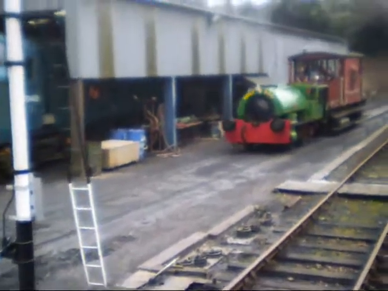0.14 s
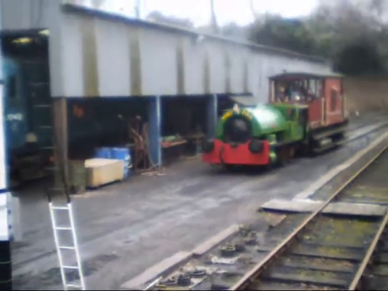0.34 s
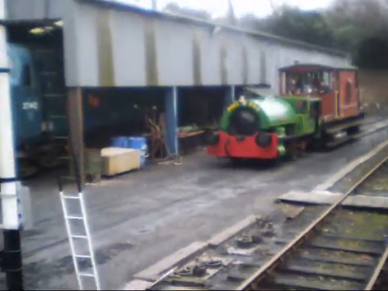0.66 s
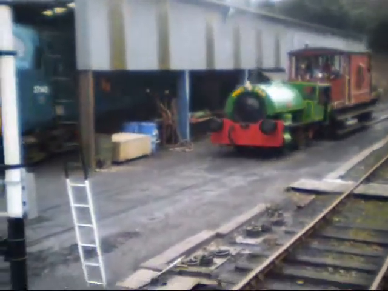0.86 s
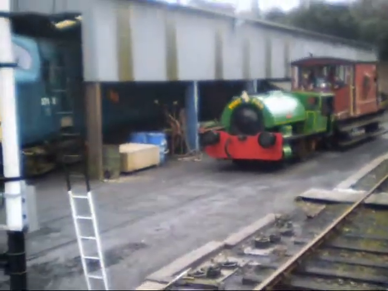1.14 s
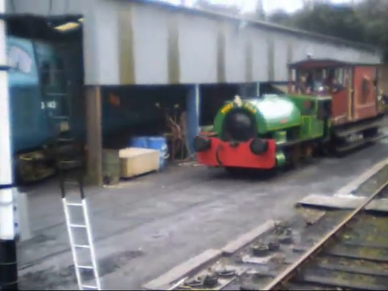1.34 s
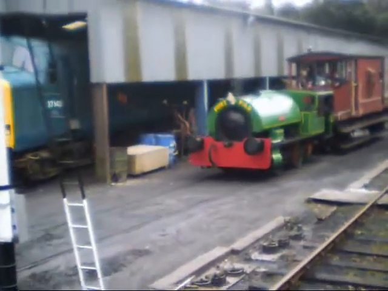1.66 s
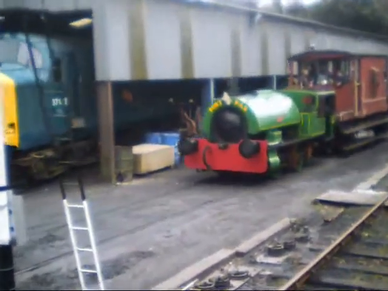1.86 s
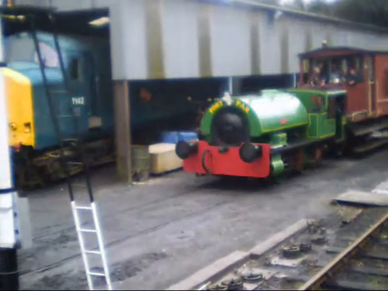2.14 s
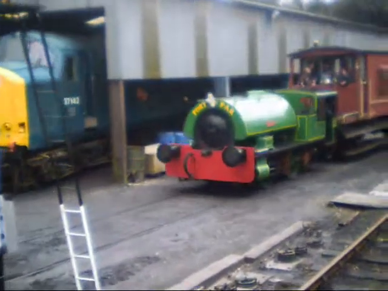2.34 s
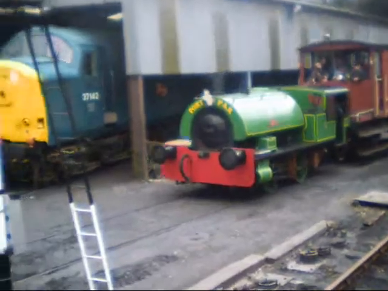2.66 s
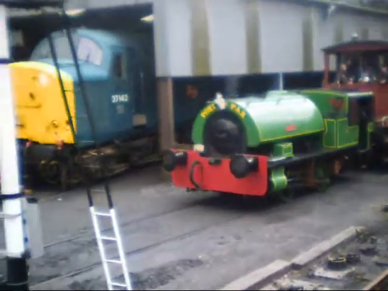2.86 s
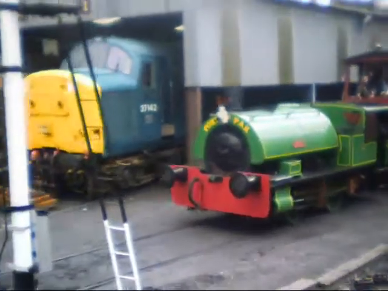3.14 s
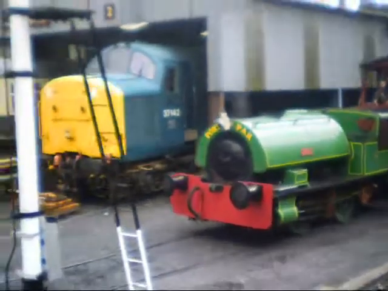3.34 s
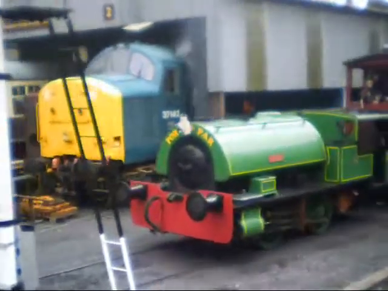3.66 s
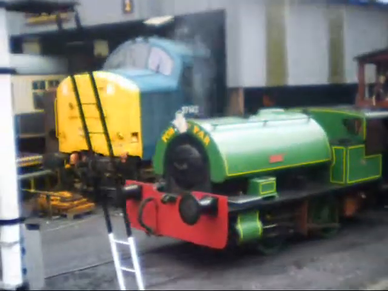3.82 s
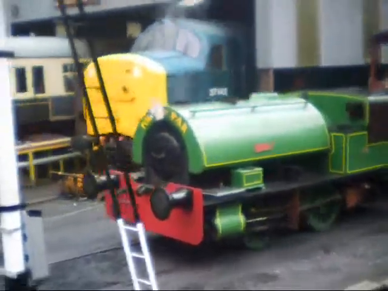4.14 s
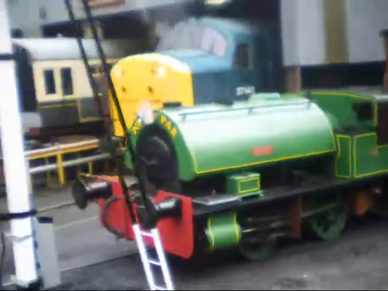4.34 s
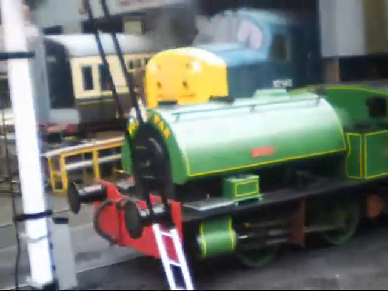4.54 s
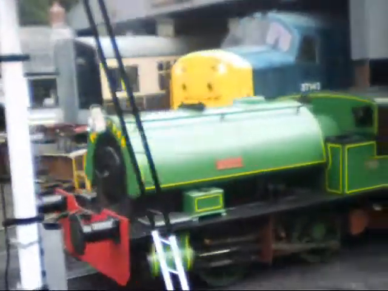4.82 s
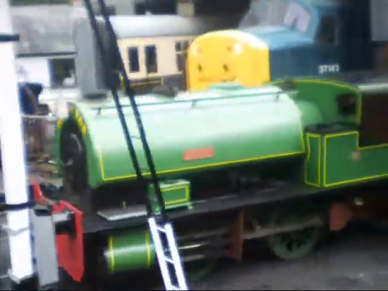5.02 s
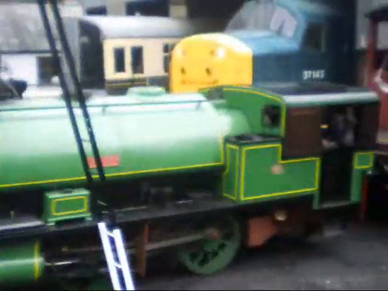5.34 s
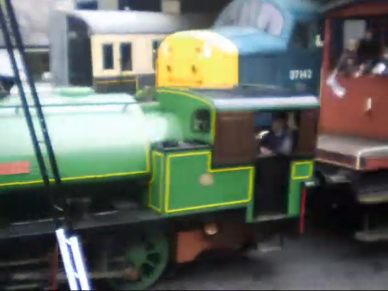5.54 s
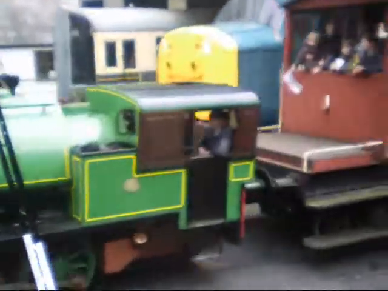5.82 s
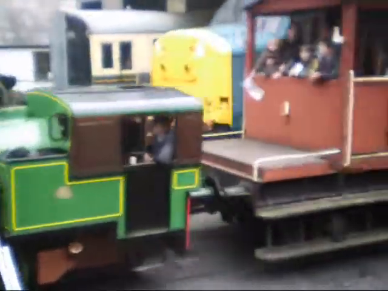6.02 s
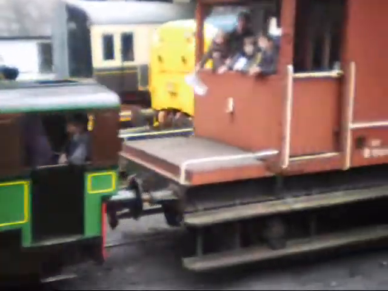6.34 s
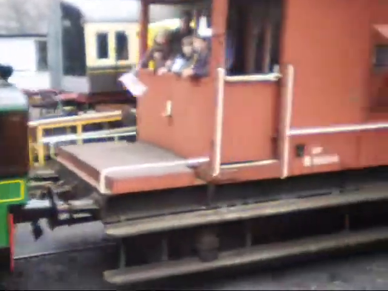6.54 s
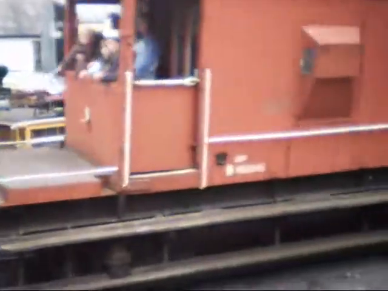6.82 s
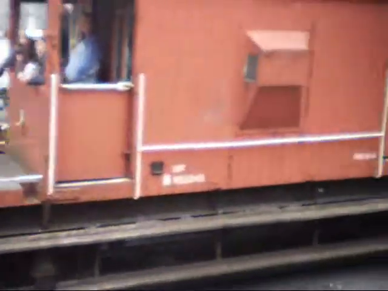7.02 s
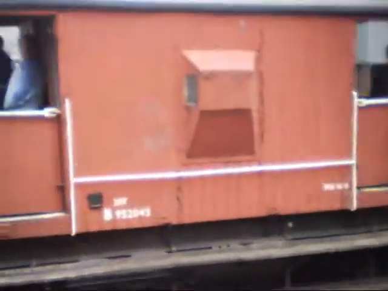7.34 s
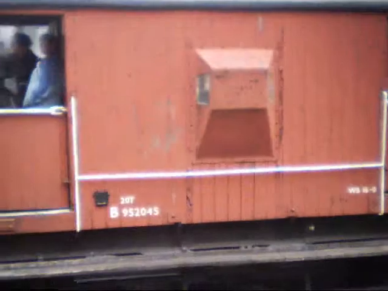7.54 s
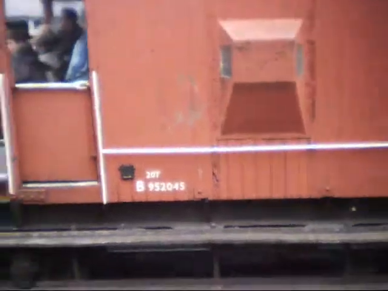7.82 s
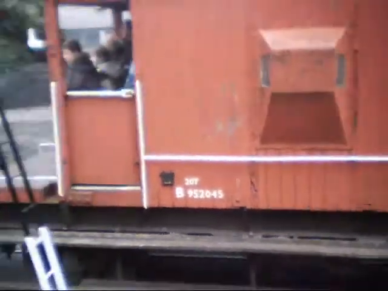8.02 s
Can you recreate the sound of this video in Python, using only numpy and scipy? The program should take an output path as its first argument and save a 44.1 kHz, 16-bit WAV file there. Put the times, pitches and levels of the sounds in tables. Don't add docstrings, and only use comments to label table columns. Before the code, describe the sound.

Outdoors beside a shed, a small steam engine and wagon roll slowly past a cheap handheld microphone. Continuous breathy steam hiss lies over a soft wheel roar, its colour shifting as the engine turns past. Light knocks come midway, then a hard metallic clank with a short squeak, and later a tiny higher squeak. Wind thumps and flutters on the microphone throughout, busiest in the second half.

```python
import sys
import numpy as np
from scipy import signal
from scipy.fft import rfft, irfft, next_fast_len
from scipy.io import wavfile
from scipy.ndimage import uniform_filter1d, map_coordinates

SR = 44100
rng = np.random.default_rng(int(sys.argv[2]) if len(sys.argv) > 2 else 0)


def volts(x):
    e = np.asarray(x, float) / 20
    return 10 ** e


def dump_mix(stems):
    frames = np.atleast_2d(stems).T
    limited = np.clip(frames, -1, 1)
    pcm = np.round(limited * 32767).astype(np.int16)
    wavfile.write(sys.argv[1], SR, pcm)


N = 360583

# frequency in Hz, level in dB per Hz.
ROAR_SPECTRUM = [(190, -36), (330, -13), (550, -8.5), (750, -2.5), (1170, -3), (1260, 4.5), (1690, -5),
                 (1830, 1), (2100, -7), (2730, -37), (4620, -120)]
# frequency in Hz, level in dB per Hz.
JET_SPECTRUM = [(1120, -37), (1900, -6), (2760, -1.5), (3000, -2.5), (3620, -0.5), (4500, -5.5),
                (5850, -52), (9900, -120)]
# frequency in Hz, level in dB per Hz.
LEAK_SPECTRUM = [(2530, -39), (4300, -1), (4500, 0), (4560, 12), (5280, 13), (6700, 3.5), (8710, -48),
                 (14700, -120)]
# frequency in Hz, level in dB per Hz.
SPRAY_SPECTRUM = [(3820, -8), (6500, -1.5), (6790, -3), (8430, 2.5), (11000, 2), (14300, -32),
                  (22000, -120)]
# time in seconds, jet level in dB, wetness as spray over jet in dB.
STEAM = [(0, -39.5, -10), (.55, -42, -10.5), (.9, -44.5, -9), (1.4, -43, -9), (1.8, -40.5, -11),
         (2.45, -39.5, -9.5), (2.65, -36, -10), (3.15, -36.5, -11), (3.8, -36, -6.5), (4.22, -36.5, -11),
         (4.4, -39, -5.5), (4.75, -43, -7), (5.6, -44.5, -4), (6.3, -42.5, -4), (6.7, -40.5, -3),
         (7.3, -45, 2.5), (7.8, -42.5, -2), (8.18, -40, -4.5)]
# time in seconds, level in dB.
ROLLING = [(0, -42.5), (.6, -42), (1.35, -45.5), (1.8, -42.5), (3.2, -42.5), (4.05, -41), (5.2, -46.5),
           (6.4, -42), (8.18, -46.5)]
# time in seconds, half length in seconds,
# gain in dB, most affected layer from 0 (roar) to 3 (spray).
PUFFS = [(.3, .15, 1, 2.5), (1.358, 0.05, 0.5, -2.5), (2.61, 0.049, 1.5, 3.5), (2.91, 0.12, -3, 0.5),
         (3.145, 0.035, -4, 1.5), (3.92, 0.12, 2.5, 1.7), (4.153, 0.066, 4.5, 3.5), (4.286, 0.029, -3, 1.7),
         (4.474, 0.043, 5, 1.7), (4.693, 0.17, 3.5, 2), (4.77, 0.048, -5.5, 1.9), (4.908, .05, 2, 1.5),
         (5.015, 0.056, -3, 2), (5.173, 0.11, 2, 1.5), (5.333, 0.073, 4, 3), (5.54, 0.052, -2.5, 3),
         (6.197, .06, 3, 3.5), (6.467, 0.026, 12.5, -0.5), (6.518, 0.048, 6, 2.5), (6.793, 0.034, 2.5, 2.5),
         (7.144, .07, 2.5, 1.6), (7.25, 0.05, -3.5, 3.5), (7.462, 0.063, 4, 1.3), (7.663, 0.07, -1.5, 3),
         (7.89, 0.021, 3.5, 2), (8.144, 0.098, 3.5, -0.7)]
# start in seconds, strongest moment in seconds, end in seconds, frequency in Hz, gain in dB.
SINGING = [(-2, .4, 14, 1002, 4.5), (0, 5, 5.05, 1403, 7.5), (-1.5, 3.5, 12.4, 1135, 7),
           (2, 2.4, 3.3, 990, 2.5), (1.5, 2.7, 4.7, 2315, 5), (-1.5, 4.4, 5, 1650, 8),
           (.5, 3.7, 7.5, 745, 4.5), (-.5, 1.8, 6.4, 868, -3.5), (2.5, 3.9, 5, 2790, 3.5),
           (4, 3.1, 5.8, 3640, 4)]
# start in seconds, strongest moment in seconds, end in seconds, frequency in Hz, gain in dB.
HOLLOWS = [(1.1, 1.7, 3.9, 3570, 3.5), (3.2, 4.2, 4.7, 2740, 3), (4, 5.2, 5.7, 7200, 9),
           (4.9, 6.3, 7.8, 4400, -1), (6.1, 6, 6.8, 11000, 9), (6.6, 8, 8.6, 1425, -19),
           (7.42, 7.46, 8.1, 3630, 7), (7.1, 8.1, 8.6, 5000, -1), (5.0, 5.37, 5.9, 5800, -6),
           (1.9, 3.3, 4.4, 1950, -5), (4.16, 4, 4.56, 575, 10.5), (0.37, 0.42, .62, 520, 6),
           (7.3, 8.4, 8.6, 710, 3.5), (4.55, 5.1, 5.6, 550, -3.5)]
# start in seconds, strongest moment in seconds, end in seconds, frequency in Hz, gain in dB.
PANELS = [(-.5, .2, 2.2, 6000, 4.5), (1.6, 2.7, 3.2, 4750, 6), (3.3, 3.55, 3.85, 4080, 7),
          (4.5, 5.8, 7.0, 3380, -4), (5.12, 5.28, 5.52, 5300, 6), (5.3, 5.34, 5.43, 5250, 12),
          (5.2, 5.35, 5.48, 6400, 5), (6.8, 7.7, 8.6, 6200, -4), (5.57, 5.62, 5.85, 1150, 3),
          (5.55, 6.05, 6.5, 5020, 7), (6.42, 6.55, 7.6, 8100, 5), (6.45, 6.8, 7.3, 5450, 4),
          (6.3, 7.6, 8.6, 7050, -6), (6.8, 7.8, 9.0, 1640, 8.5), (2.5, 2.68, 2.9, 3500, 3)]
# start in seconds, strongest moment in seconds, end in seconds, frequency in Hz, gain in dB.
RIDGES = [(2.2, 2.9, 3.6, 2780, 2.5), (3.9, 4.2, 4.8, 2740, 4.5), (5, 3.7, 4.3, 2800, -4),
          (1, 2.6, 2.9, 3760, 3.5), (2.9, 3.1, 3.4, 3690, 6), (3.5, 4.1, 4.3, 3560, 4.5),
          (4.5, 3.8, 3.8, 4130, 5), (5, 3.6, 3.9, 3900, 1), (2.3, 2.65, 3.2, 3250, 5),
          (2.5, 2.7, 2.95, 2310, 3), (4.35, 4.5, 4.6, 4050, 5), (1.9, 2.7, 3.3, 4430, -6),
          (2, 2.7, 3.2, 2300, -6), (3, 4.5, 4.7, 5150, -7), (3.6, 4.2, 4.6, 5460, 4.5),
          (4.2, 4.95, 5.3, 2400, -8), (4.5, 6.2, 7.5, 2606, 7.5), (6.6, 7.3, 8.1, 4900, -4),
          (1.1, 1.4, 2.5, 4200, 10.5), (-2, 1.0, 2.1, 2440, 1), (0, 2.2, 2.9, 4450, -1),
          (-1, .5, 1.2, 4000, -4), (3.5, 5.45, 6.1, 5620, -8), (7.5, 8.15, 8.5, 2830, 7),
          (7.25, 7.55, 7.95, 2780, -4), (6.9, 7.7, 8.4, 1600, 4), (6.9, 7.3, 8.4, 1720, 2.5),
          (5.8, 6.15, 7.1, 1330, -5), (0, 1.45, 1.8, 4300, 4), (4.2, 4.45, 4.6, 5200, -4),
          (4.0, 4.1, 4.2, 1650, -3), (1.8, 1.93, 2.1, 4250, 3), (2, 1.85, 2.1, 4600, 6.5),
          (7.5, 6.8, 7.64, 2000, 9), (0, 2.4, 3.0, 2500, -3), (6, 5.15, 5.7, 2800, 6),
          (4.5, 4.8, 5.8, 7850, -6), (3, 5.6, 6.1, 6100, -10)]
# start in seconds, strongest moment in seconds, end in seconds, frequency in Hz, gain in dB.
WHISTLES = [(-.4, .08, .5, 2860, 7.4), (-.4, .1, .7, 3600, 6.3), (0, .2, .7, 3330, 5),
            (-.2, .15, .4, 4140, 5), (.3, .5, 0.87, 2400, 7.1), (1.9, 2.25, 2.55, 3720, 8),
            (1.95, 2.2, 2.6, 2760, 7), (2.0, 2.25, 2.5, 2100, 4.7), (2.3, 2.65, 2.9, 4850, 5.4),
            (2.75, 2.92, 3.2, 2860, 7), (2.85, 3.05, 3.6, 4150, 4.9), (3.15, 3.25, 3.5, 2850, 6),
            (3.55, 3.8, 4.3, 2706, 7.8), (4.0, 4.12, 4.6, 3150, 6), (4.0, 4.2, 4.4, 2080, 4),
            (5.0, 5.12, 5.7, 1700, 8.8), (5.0, 5.12, 5.3, 1403, 4.3), (4.5, 4.8, 5.7, 2070, 5.9),
            (5.2, 5.4, 6.4, 1000, 4), (4.55, 4.62, 5.7, 7300, 6), (4.85, 4.95, 5.9, 7300, 4),
            (5.2, 5.28, 5.9, 7380, 7.6), (5.28, 5.36, 5.5, 7180, 7), (5.68, 5.74, 5.8, 7300, 6),
            (5.9, 5.97, 6.03, 7350, 5.2), (7.6, 8.0, 9.9, 3060, 9.2), (7.95, 8.15, 8.4, 3500, 4),
            (7.4, 7.7, 8.0, 1850, 3)]
# delay in seconds, level in dB, phase turn in cycles,
# frequency in Hz above which it is dull, time in seconds by which it sinks to a quarter.
ECHOES = [(.0076, -8.5, .63, 1900, 6.6), (.0075, -14, .0, 6000, 6.6), (.00219, -14, .0, 12000, 8.5),
          (.001096, -15, .0, 12000, 8.5)]
# time in seconds, peak in dB,
# loudest ring in Hz, ring's 60 dB decay in seconds, clatter in dB.
KNOCKS = [(2.945, -34, 2300, .05, -57), (5.0175, -34, 1760, 0.035, -43), (5.021, -35, 2400, .03, -43),
          (5.5705, -33, 2050, 0.04, -37), (5.574, -35, 1136, 0.2, -39), (7.198, -37, 950, 0.25, -38),
          (7.2055, -34, 1400, 0.05, -38), (6.429, -32, 2690, 0.09, -58), (6.4495, -21, 1224, 0.12, -36),
          (6.4655, -20, 1205, 0.05, -37), (6.474, -28, 1810, 0.08, -34), (6.488, -30, 833, 0.13, -46),
          (7.89, -33, 3130, 0.061, -56)]
# start in seconds, loudest moment in seconds, end in seconds,
# frequency in Hz, peak in dB.
SQUEAKS = [
    (6.486, 6.511, 6.552, 4340, -23),
    (6.535, 6.55, 6.58, 4355, -38),
    (7.295, 7.349, 7.372, 8244, -26),
]
# frequency in Hz, width
# in Hz, gain in dB.
CASING = [(2680, 130, -3), (3430, 590, -4.5), (3660, 23, 3), (1854, 130, -6.5), (6450, 150, -2.5)]
# time in seconds, time to fade 20 dB in ms,
# pressure swing in dB, thump over swing in dB.
BUFFETS = [(0.08, 950, -26, -11.5), (0.31, 180, -42, 5), (0.49, 300, -16, -4), (1.11, 154, -35, -6),
           (1.35, 110, -36, 8), (1.94, 110, -19.5, -10), (2.02, 500, -20.5, -27), (2.17, 150, -20, -7.5),
           (2.65, 1002, -24.5, -9), (3.12, 90, -40, 2), (3.22, 170, -25.5, -20), (3.57, 392, -30.5, -8.5),
           (3.8, 222.5, -27.5, -7), (4.06, 98, -39.5, 12.5), (4.19, 110, -21, 1.5), (4.33, 544, -18, -19),
           (4.34, 120, -36, 13), (4.46, 100, -19, 1), (4.96, 355, -30.5, -8.5), (5.45, 330, -23.5, -9.5),
           (5.78, 190, -23.5, -13), (5.91, 290, -37.5, 5.5), (6.16, 320, -24.5, -7), (6.27, 140, -34, 4),
           (6.54, 187, -27.5, -7.5), (6.79, 298, -23.5, -7.5), (7.04, 218, -23, -19), (7.27, 270, -25, -6),
           (7.59, 372, -30, -0.5), (8.3, 792, -27.5, -2)]
# time in seconds, time to fade 20 dB in ms,
# flutter in dB, rustle over flutter in dB.
FLURRIES = [(-0.11, 272, -43, -3), (0.29, 51, -36, -19), (0.48, 268, -39.5, -25), (1.34, 140, -45.5, -29),
            (1.6, 150, -61, 0), (1.9, 120, -45, -16), (.72, 82, -54, -5), (3.4, 48, -56, -1),
            (2.03, 130, -42, -17), (2.21, 140, -47, -11), (2.7, 47, -50, -9), (2.87, 792.5, -50.5, -10),
            (3.36, 387, -56, -1.5), (3.77, 191, -51.5, -9), (4.15, 158, -34.5, -13),
            (4.41, 214, -35.5, -3.5), (4.44, 30, -43, 5), (4.475, 30, -40, 8), (4.7, 119, -50, -22),
            (4.92, 187, -42, -10), (5.33, 88, -38.5, -18), (5.51, 146, -41, -5.5), (5.8, 160, -45.5, -7),
            (5.97, 88, -38.5, 3), (6.09, 56, -41, -6), (6.23, 134, -38, 1), (6.34, 170, -39, 2),
            (6.44, 110, -37.5, -0.5), (6.62, 138, -41, 0), (6.82, 178, -36, -8.5), (6.94, 68, -42, -5),
            (7.13, 138, -37, -5.5), (7.19, 28, -41, -1), (5.25, 60, -55, -15), (7.29, 68, -39, -15),
            (7.47, 270, -36, 2), (7.69, 184, -34.5, -15), (8.1, 374, -39.5, -13)]
# time in seconds, step in dB, settling time in seconds.
BREAKS = [
    (.265, 6, 0.046),
    (.61, -9, 0.1),
    (2.33, -6.5, 0.1),
    (4.53, 0, .07),
    (5.1, -7, 0.13),
    (5.92, 2.5, .08),
    (7.75, -2.5, .15),
]
# time in seconds, peak in dB, width in ms.
SNAPS = [(0.288, -24, 3), (0.31, -23.5, 3), (0.446, -34, 1.7), (0.485, -20, 5.1), (0.499, -22, 5.2),
         (0.555, -34, 7.1), (1.902, -29, 4.7), (4.045, -28.5, 4.8), (4.117, -28, 3.4), (4.15, -24, 2.6),
         (4.163, -26, 4), (4.183, -24, 2.9), (4.2, -30, 6.2), (4.323, -27, 2.1), (4.347, -27.5, 2.2),
         (4.362, -24, 3.3), (4.382, -25, 5.6), (4.403, -26, 5.0), (4.43, -30, 2.3), (4.456, -33, 4.6),
         (4.473, -31, 4.2), (4.489, -28, 2.9), (5.914, -23, 3.2), (5.944, -26, 1), (5.968, -21, 1.6),
         (5.984, -30, 2.2), (6.085, -30, 3.4), (6.236, -27, 3.8), (6.267, -28, 3.2), (6.31, -30, 3.1),
         (6.337, -28, 1.7), (6.39, -31, 2.0), (6.418, -27, 1.6), (6.444, -26, 2.1), (6.467, -28, 2.7),
         (6.657, -29, 2.0), (6.749, -22.5, 8.1), (6.778, -29, 2.7), (6.84, -24, 2.9), (6.932, -29, 2.5),
         (7.103, -24, 2.6), (7.134, -29, 2.3), (7.266, -25, 3.7), (7.285, -29, 2.6), (7.299, -29, 2.5),
         (7.374, -25, 1.5), (7.392, -27, 4.5), (7.425, -26, 3.2), (7.452, -24, 3.1), (7.501, -31, 2.0),
         (7.54, -32, 4.4), (7.599, -31, 2.6), (7.653, -26, 3.4), (7.696, -30, 6.4), (7.714, -26, 2.7),
         (8.138, -29, 8.2)]
# time in seconds, step in dB, recovery in seconds.
DUCKS = [
    (.625, -2.5, 0.56),
    (4.527, -4.5, 0.28),
]

RIDGE_WAVER, SINGING_WAVER = .008, .004


def steam_and_roar():
    (rolling,), (steam, wetness) = in_time(ROLLING), in_time(STEAM)
    cab_facing = fill_in(swell(1.6, 6.2, 7.1))
    cab = -45 + 0.13 * (steam - steam.mean()) + 3 * cab_facing
    roar, jet, leak, spray = np.add([rolling, steam, cab, steam + wetness], puffs())
    gusts = drift(32)
    out = volts(roar - 1.36) * hiss(ROAR_SPECTRUM, 0.17 * gusts, 0.93, count=12)
    out += volts(jet - 1.0) * hiss(JET_SPECTRUM, 0.073 * gusts + 0.054 * drift(28), 1.87, count=12)
    out += volts(leak - 2.5) * hiss(LEAK_SPECTRUM, 0.27 * gusts + 1.33 * drift(43), 2.3, count=9)
    out += volts(spray + 0.5) * hiss(SPRAY_SPECTRUM, 0.1 * gusts + 1.1 * drift(55), 2.24, count=13)
    return out


def hiss(spectrum, throb, patchy_db, count):
    hz, level_db = np.transpose(spectrum)
    edges = np.geomspace(hz[1] * .9, min(hz[-3] * 1.05, SR / 4), count + 1)
    white = rng.standard_normal((3, N))
    out = 0
    for k, (low, high) in enumerate(zip(edges, edges[1:])):
        gain_db = np.interp(np.log(low * high) / 2, np.log(hz), level_db)
        flicker_db = patchy_db * (drift(3.4) / 4 + drift(17.3))
        out = out + fill_in(volts(gain_db + throb + flicker_db)) * band(white[k % 3], low, high)
    return rms_one(out)


def puffs():
    s, half_s, gain_db, layer = np.transpose(PUFFS)[:, :, None]
    shape_db = gain_db * np.exp(-((slow_time() - s) / half_s) ** 2)
    return [fill_in(np.sum(shape_db * np.exp(-((k - layer) / 1.44) ** 2), axis=0)) for k in range(4)]


def cavities(x, *kinds):
    out = x.copy()
    for rows, width_hz, waver in kinds:
        r = np.exp(-np.pi * 1.5 * width_hz / SR)
        for start, top, end, hz, gain_db in rows:
            span = slice(max(round(start * SR), 0), round(end * SR))
            flutter = drift(15)
            facing = np.sqrt(swell(start, top, end)) * np.clip(1 + 0.14 * flutter, 0, 2)
            centre = hz * (1 + waver * rms_one(uniform_filter1d(flutter, size=500)))
            turn = np.exp(2j * np.pi / SR * np.cumsum(fill_in(centre, span)))
            low = signal.lfilter([(1 - r) ** 2], [1, -2 * r, r * r], x[span] * turn.conj())
            passed = 2 * np.real(low * turn)
            out[span] += fill_in(volts(gain_db * facing) - 1, span) * passed
    return out


def reflections(x):
    size, at = next_fast_len(N), np.arange(N)
    spectrum, hz = rfft(x, size), np.fft.rfftfreq(size, 1 / SR)
    out = x.copy()
    for delay_s, level_db, turn, cut_hz, until in ECHOES:
        copy = irfft(spectrum * np.exp(2j * np.pi * turn) / (1 + (hz / cut_hz) ** 4), size)[:N]
        wander_s = .00004 * min(cut_hz / 9000, 1)
        lag = SR * (delay_s + wander_s * fill_in(drift(0.35)))
        ending = np.clip((until - at / SR) / 0.11, .25, 1)
        strength = fill_in(volts(level_db + 2 * drift(0.97))) * ending
        out += strength * map_coordinates(copy, [at - lag], order=2)
    return out


def knocks():
    out, t = np.zeros(N), np.arange(SR // 4) / SR
    for s, peak_db, hz, t60, clatter_db in KNOCKS:
        blow = volts(peak_db - 60 * t / t60) * np.sin(2 * np.pi * hz * t)
        dying = volts(-60 * t / 0.2) + volts(2.5 - 60 * t / 0.02)
        noise = evened(band(rng.standard_normal(len(t)), 570, 2300), 0.00588)
        clatter = noise * volts(clatter_db) * dying
        at = round(s * SR)
        out[at:at + len(t)] += (blow + clatter) * np.minimum(t / .002, 1)
    return out


def squeaks():
    t, out = np.arange(N) / SR, np.zeros(N)
    rise_per_s = 0.071
    for start, top, end, hz, peak_db in SQUEAKS:
        level = fill_in(volts(peak_db + 1.1 * drift(67)) * swell(start, top, end))
        out += level * np.sin(2 * np.pi * hz * (t + rise_per_s * (t - top) ** 2 / 2))
    return out


def casing(x):
    for hz, width_hz, gain_db in CASING:
        x = x + (volts(gain_db) - 1) * resonate(x, hz, width_hz)
    return x


def wind():
    swings, thumps = eddies(BUFFETS, calm_db=-61, finer_calm_db=-46)
    flutter, rustle = eddies(FLURRIES, calm_db=-67, finer_calm_db=-65.5)
    lumps = drift(15.5)
    falling = signal.lfilter([1], [1, -.999], rng.standard_normal((4, N)))
    peaks, near = snaps()
    thumps, flutter, rustle = (1 - .75 * near) * [thumps, flutter, rustle]
    thump_lumps = fill_in(volts(2.0 * lumps))
    flutter_lumps = fill_in(volts(1.8 * lumps + 1.2 * drift(26)))
    rustle_lumps = fill_in(volts(2.4 * lumps + 3.0 * drift(67)))
    rustling = band(band(falling[3], 176, 391), 140, 910)
    out = volts(-3.5) * swings * evened(band(falling[0], 2.46, 19.7), 0.38)
    out += volts(-2.5) * thumps * evened(band(falling[1], 12.4, 72.0) * thump_lumps, 0.194)
    out += volts(-0.5) * flutter * evened(band(falling[2], 63.3, 203) * flutter_lumps, .07)
    out += volts(-1) * rustle * evened(rustling * rustle_lumps, .07)
    return .3 * np.tanh((steps(BREAKS) * out + peaks) / .3)


def eddies(rows, calm_db, finer_calm_db):
    s, fade_ms, level_db, finer_db = np.transpose(rows)[:, :, None]
    shape_db = level_db - 20 * np.abs((slow_time() - s) * 1000 / fade_ms) ** 1.5
    return [fill_in(np.sqrt(volts(calm) ** 2 + np.sum(volts(2 * db), axis=0)))
            for calm, db in ((calm_db, shape_db), (finer_calm_db, shape_db + finer_db))]


def snaps():
    out, near = np.zeros(N + SR), np.zeros(N + SR)
    t_ms = np.arange(-1000, 1001) / SR * 1000
    for s, peak_db, width_ms in SNAPS:
        away, at = np.abs(t_ms) / (.55 * width_ms), round(s * SR) - 1000
        peak, trough = 1.6 * np.exp(-away ** 1.6), .5 * np.exp(-(away / 2.6) ** 2)
        out[at:at + len(t_ms)] += volts(peak_db) * (peak - trough)
        near[at:at + len(t_ms)] += np.exp(-(away / 2.03) ** 2)
    return out[:N], np.minimum(near[:N], 1)


def steps(rows):
    t = np.arange(N) / SR
    return volts(sum(step_db * np.clip((t - s) / 0.0052, 0, 1) * np.exp(-np.abs(t - s) / back)
                   for s, step_db, back in rows))


def rms_one(x):
    return x / np.sqrt(np.mean(x ** 2) + 1e-20)


def evened(x, over_s):
    return x / np.sqrt(uniform_filter1d(x ** 2, round(over_s * SR)) + 1e-20)


def band(x, low_hz, high_hz):
    return signal.sosfilt(signal.butter(2, [low_hz, high_hz], "band", fs=SR, output="sos"), x)


def resonate(x, hz, width_hz):
    r = np.exp(-np.pi * width_hz / SR)
    top = np.array([1, 0, -1]) * (1 - r * r) / 2
    return signal.lfilter(top, [1, -2 * r * np.cos(2 * np.pi * hz / SR), r * r], x)


def in_time(rows):
    s, *columns = np.transpose(rows)
    return [np.interp(np.arange(N) / SR, s, c) for c in columns]


def slow_time():
    return np.arange(0, N + 20, 20) / SR


def drift(rate):
    r = np.exp(-40 * np.pi * rate / SR)
    slow = signal.lfilter([1], [1, -2 * r, r * r], rng.standard_normal(N // 20 + 2002))[2000:]
    return rms_one(slow - slow.mean())


def swell(start, top, end):
    t = np.arange(N // 20 + 2) * 20 / SR
    return np.sin(np.pi / 2 * np.interp(t, [start, top, end], [0, 1, 0])) ** 2


def fill_in(slow, span=slice(None)):
    return np.interp(np.arange(N)[span] / 20, np.arange(len(slow)), slow)


def scene():
    hissing = cavities(steam_and_roar(), (SINGING, 32, SINGING_WAVER), (HOLLOWS, 246, RIDGE_WAVER),
                       (PANELS, 500, 0))
    hissing = reflections(hissing)
    hissing = cavities(hissing, (RIDGES, 137, RIDGE_WAVER), (WHISTLES, 53, SINGING_WAVER))
    train = casing(hissing + knocks())
    return (train + squeaks() + wind())[None]


def top_cut(x):
    return signal.sosfilt(signal.butter(12, 15470, fs=SR, output="sos"), x)


def record(dry):
    gained = dry * steps(DUCKS)
    held = np.repeat(gained[:, ::2], 2, axis=1)[:, :N]
    return top_cut(held - .0103)


dry = scene()
out = record(dry)
dump_mix(out)
```